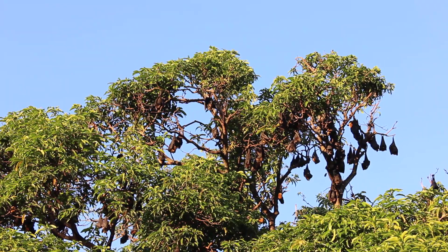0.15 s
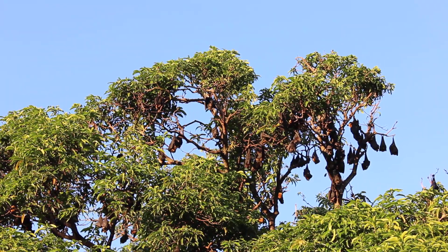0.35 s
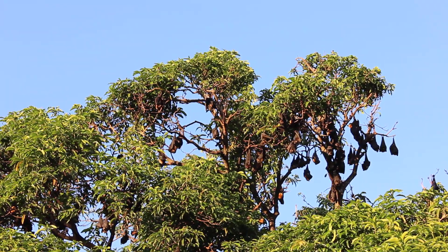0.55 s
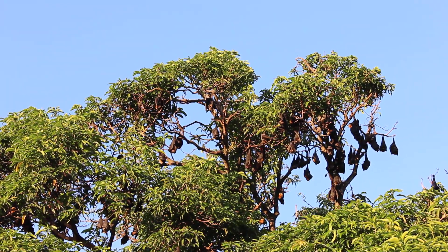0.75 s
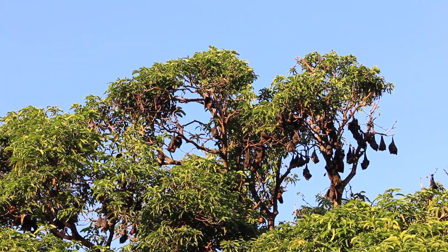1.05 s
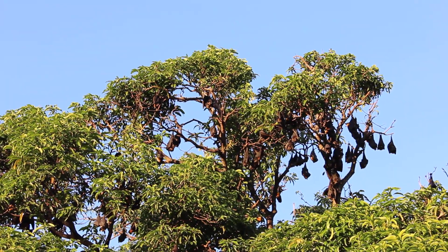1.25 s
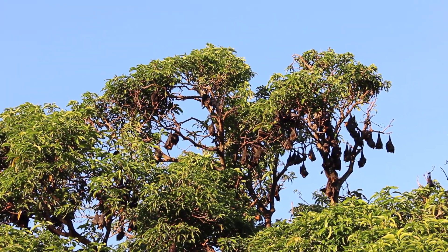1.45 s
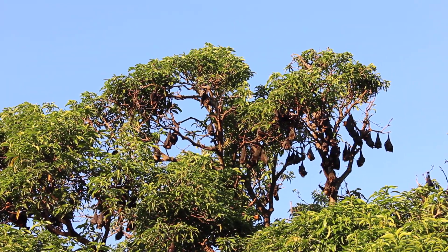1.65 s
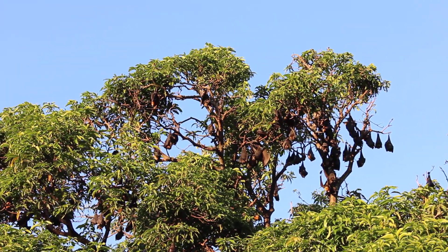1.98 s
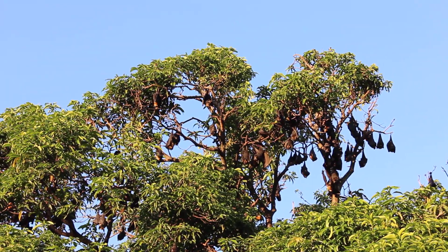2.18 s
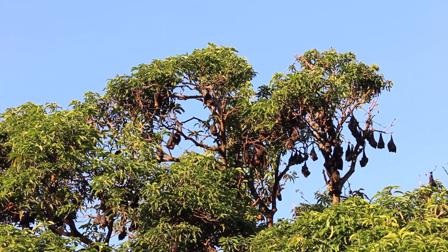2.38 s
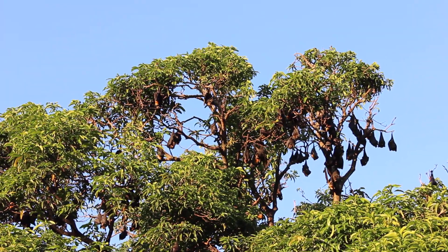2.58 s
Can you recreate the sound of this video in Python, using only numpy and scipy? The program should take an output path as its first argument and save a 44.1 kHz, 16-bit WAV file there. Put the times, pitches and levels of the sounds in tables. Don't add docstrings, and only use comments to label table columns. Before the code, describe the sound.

Bats squeal and chatter in a treetop roost, one closer voice standing out and breaking into a rasp midway, then neighbours answering as the crowd grows livelier; open air, soft leafy scatter, low distant rumble, centred microphone.

```python
import sys
import numpy as np
from scipy import signal
from scipy.fft import rfft, irfft
from scipy.io import wavfile

SR = 44100
rng = np.random.default_rng(int(sys.argv[2]) if len(sys.argv) > 2 else 0)


def elevation(decibels):
    levels = np.asarray(decibels, float)
    return 10 ** (levels / 20)


def master_out(mix):
    frames = np.transpose(np.atleast_2d(mix))
    ceiling = np.clip(frames, -1, 1)
    pcm = np.round(ceiling * 32767).astype(np.int16)
    wavfile.write(sys.argv[1], SR, pcm)


N = 119952
T = np.arange(N) / SR

OVERTONES_DB = [-28.5, -33, -41, -44, -44]
ATTACK_S, RELEASE_S = .004, .011
WAVER_SHARE, WAVER_PER_S = .006, 45
FLUTTER_DB, FLUTTER_PER_S = 2.6, 70
TOP_HZ = 15750


def rms_one(x):
    return x / np.sqrt(np.mean(x ** 2) + 1e-20)


def drift(rate):
    pole = np.exp(-32 * np.pi * rate / SR)
    noise = rng.standard_normal(N // 16 + 2002)
    slow = signal.lfilter([1], [1, -2 * pole, pole * pole], noise)[2000:]
    return np.interp(np.arange(N) / 16, np.arange(len(slow)), rms_one(slow))


def span(start, length):
    end = start + length + RELEASE_S
    at = slice(max(int(start * SR), 0), min(int(end * SR), N))
    t = T[at] - start
    rise, fall = t / ATTACK_S, (length + RELEASE_S - t) / RELEASE_S
    return at, np.clip(np.minimum(rise, fall), 0, 1)


def band(x, low_hz, high_hz):
    sos = signal.butter(2, [low_hz, min(high_hz, .45 * SR)], "band", fs=SR, output="sos")
    return signal.sosfilt(sos, x)


def coloured(spectrum, patchy_db):
    hz, db = np.transpose(spectrum)
    f = np.arange(N // 2 + 1) * SR / N + 1e-3
    edges = 20 * 2 ** np.arange(0, 10, 1 / 3)
    shaped = rfft(rng.standard_normal(N)) * elevation(np.interp(np.log(f), np.log(hz), db, left=-99))
    out = np.zeros(N)
    for low, high in zip(edges, edges[1:]):
        out += elevation(patchy_db * drift(7.4)) * irfft(shaped * (f >= low) * (f < high), N)
    return rms_one(out)


def voice(hz, overtones):
    phase = 2 * np.pi * np.cumsum(hz) / SR
    tone = np.sin(phase)
    for multiple, db in enumerate(overtones, 2):
        tone = tone + elevation(db) * np.sin(multiple * phase) * (multiple * hz < TOP_HZ)
    return np.sqrt(2) * tone


def squeals(calls, rough):
    out, waver, flutter = np.zeros(N), drift(WAVER_PER_S), drift(FLUTTER_PER_S)
    for rows in calls:
        s, pitch, db = np.transpose(rows)
        at, shape = span(s[0], s[-1] - s[0])
        level = elevation(np.interp(T[at], s, db) + rough * FLUTTER_DB * flutter[at])
        hz = np.interp(T[at], s, pitch) * (1 + rough * WAVER_SHARE * waver[at])
        out[at] += shape * level * voice(hz, OVERTONES_DB)
    return out


def chirps(rows, waver_share, overtones):
    out, waver, flutter = np.zeros(N), drift(WAVER_PER_S), drift(FLUTTER_PER_S)
    for k, (s, length, first, last, db) in enumerate(rows):
        at, shape = span(s, length)
        own = (np.arange(at.start, at.stop) + 7919 * k) % N
        hz = np.interp(T[at], [s, s + length], [first, last]) * (1 + waver_share * waver[own])
        out[at] += shape * elevation(db + FLUTTER_DB * flutter[own]) * voice(hz, overtones)
    return out


def trees(x):
    t60_s = .22
    t = T[:SR // 2]
    tail = rng.standard_normal(len(t)) * elevation(-60 * t / t60_s) * (t > .004)
    return signal.fftconvolve(x, tail / np.sqrt(np.sum(tail ** 2)))[:N]


def wind_and_traffic():
    # [f/Hz, level/dB per Hz]
    rumble_spectrum = [(21, -38), (35, -7.5), (119, 2), (451, -4.5), (838, -1.5), (1550, -3.5),
                       (1900, -7.5), (2470, -50), (4180, -120)]
    return elevation(-31) * coloured(rumble_spectrum, patchy_db=0.91)


def blurred_chorus(stir_db):
    # [f/Hz, level/dB per Hz]
    blur_spectrum = [(1500, -20.5), (2000, -6.5), (2600, -1), (3900, -8.5), (6900, -16), (9200, -29.5),
                     (13000, -36), (15800, -40)]
    follows = 0.22
    return elevation(-22.5 + follows * (stir_db - stir_db.mean())) * coloured(blur_spectrum, patchy_db=1.77)


def far_crowd(stir_db, count=600):
    pitch_hz, spread, glide_share, call_s, uneven_db = 2683, 0.13, 0.0415, 0.0338, 2.0
    place, size = rng.random((count, 2)).T
    pitch, glide, uneven = rng.standard_normal((count, 3)).T
    first = pitch_hz * np.exp(spread * np.where(pitch > 0, pitch, .6 * pitch))
    last = first * (1 + glide_share * glide)
    rows = zip(place * N / SR - .01, call_s * (0.542 + 1.5 * size), first, last, uneven_db * uneven)
    calls = rms_one(chirps(list(rows), 0.02075, [-22]))
    return elevation(stir_db - 6) * rms_one(calls + elevation(10.5) * trees(calls))


def chirping_bats():
    # [t/s, length/s, first f/Hz, last f/Hz, level/dB]
    near_chirps = [(0, .07, 3600, 3440, -30), (.04, .035, 4720, 4600, -34), (.25, .05, 3180, 3170, -31),
                   (.485, .04, 3260, 3250, -28), (.70, .035, 2720, 2920, -27), (.735, .03, 2920, 2750, -31),
                   (.725, .022, 2250, 2340, -24), (.825, .045, 3360, 3350, -25),
                   (.92, .045, 3260, 3260, -28), (1.005, .045, 3260, 3270, -25),
                   (1.065, .105, 4420, 4220, -29), (1.085, .075, 3560, 3480, -31),
                   (1.07, .08, 2780, 2660, -28), (1.395, .03, 2500, 2780, -23),
                   (1.44, .06, 4220, 4230, -33), (2.032, .01, 2700, 3120, -19),
                   (2.042, .01, 3150, 3130, -16), (2.06, .04, 2960, 2820, -22),
                   (2.07, .09, 3080, 3100, -28), (2.15, .02, 2290, 2300, -24),
                   (2.215, .02, 2800, 2830, -26), (1.64, .1, 2760, 2720, -27)]
    # [t/s, length/s, first f/Hz, last f/Hz, level/dB]
    edge_chirps = [(.035, .04, 5300, 5150, -34), (.662, .03, 5200, 5780, -34),
                   (.692, .012, 5780, 5760, -35), (.708, .008, 5700, 5800, -29),
                   (.722, .02, 5750, 5600, -35), (.68, .09, 1630, 1640, -39), (.71, .025, 3550, 3620, -31),
                   (.73, .012, 6780, 7080, -28), (.755, .03, 6960, 7000, -30),
                   (.742, .008, 6250, 6400, -31), (.81, .02, 5250, 5280, -35),
                   (1.30, .035, 5250, 5050, -33), (1.335, .055, 3000, 2960, -29),
                   (1.42, .025, 3450, 3480, -30), (1.51, .07, 3500, 3480, -33),
                   (1.575, .025, 1920, 1910, -32), (1.80, .03, 2550, 2560, -25),
                   (2.09, .29, 1740, 1745, -37.5), (2.26, .04, 3150, 3140, -27),
                   (2.31, .07, 3500, 3480, -28), (2.335, .025, 3140, 3130, -28),
                   (2.41, .055, 3200, 3170, -28), (1.865, .065, 740, 860, -37),
                   (1.955, .035, 840, 730, -37), (1.822, .016, 780, 780, -37),
                   (1.655, .03, 4780, 4820, -36), (1.745, .05, 4620, 4720, -35),
                   (1.82, .04, 4900, 5050, -36), (1.945, .025, 4800, 4760, -33),
                   (1.87, .04, 6600, 6450, -38)]
    return chirps(near_chirps + edge_chirps, WAVER_SHARE, OVERTONES_DB)


def screeches(count=28):
    # [t/s, length/s, throat f/Hz, width/Hz, level/dB]
    hoarse_calls = [(.135, .05, 12300, 4800, -44), (.2, .06, 11800, 4000, -44),
                    (.278, .09, 11800, 2800, -42), (.38, .14, 11700, 3000, -43), (.2, .21, 10200, 500, -48),
                    (.43, .095, 10700, 1000, -44), (.27, .2, 7700, 1800, -40), (.47, .06, 7400, 1400, -35),
                    (.135, .06, 6950, 400, -41), (.74, .045, 11700, 1800, -41), (.75, .3, 7600, 1700, -34),
                    (.79, .18, 7050, 450, -40), (.855, .115, 12200, 1100, -44),
                    (.995, .05, 12000, 900, -46), (.8, .05, 13050, 400, -54), (.67, .39, 9800, 3000, -45),
                    (.555, .06, 3200, 600, -27), (1.188, .035, 2900, 900, -25),
                    (.565, .045, 12150, 500, -50), (.66, .11, 5900, 1600, -38),
                    (1.45, .15, 9000, 5000, -48), (1.85, .16, 7000, 4000, -43), (1.72, .25, 4700, 800, -40),
                    (2.5, .22, 11500, 5000, -50), (2.51, .1, 6000, 2000, -39), (2.53, .14, 530, 160, -43),
                    (1.55, .3, 2500, 700, -24), (2.38, .3, 3500, 1200, -28)]
    rasp_hz, wander, jitter, breath = 540, .05, .005, .95
    hz = rasp_hz * (1 + wander * drift(8) + jitter * drift(120))
    phase = 2 * np.pi * np.cumsum(hz) / SR
    pulses = sum(np.cos(k * phase + k * k / 4) for k in range(1, count))
    rasp = rms_one(pulses) + breath * rng.standard_normal(N)
    rasp = rasp * elevation(0.58 * drift(11) + 1.0 * drift(210))
    out = np.zeros(N)
    for s, length, throat_hz, width, db in hoarse_calls:
        at, shape = span(s, length)
        throat = band(rasp[at], throat_hz - width / 2, throat_hz + width / 2)
        out[at] += elevation(db) * shape * rms_one(throat)
    return out


def neighbours():
    # [t/s, f/Hz, level/dB]
    shrill_squeals = [
        [(.325, 3060, -20), (.348, 2960, -22), (.362, 3200, -19), (.372, 3250, -21), (.385, 3290, -25),
         (.415, 3220, -22.5)],
        [(.555, 3244, -28), (.572, 3080, -22), (.585, 3150, -20), (.6, 3280, -21), (.612, 3230, -26)],
        [(2.245, 2410, -34), (2.27, 2520, -22), (2.295, 2624, -21), (2.31, 2520, -22), (2.335, 2450, -28)],
        [(2.355, 2600, -32), (2.39, 2530, -30), (2.415, 2480, -16), (2.43, 2580, -22), (2.46, 2570, -23)],
    ]
    # [t/s, f/Hz, level/dB]
    deep_squeals = [
        [(1.445, 2370, -20), (1.47, 2190, -21), (1.52, 2240, -22.5), (1.56, 2290, -25)],
        [(1.6, 2300, -25), (1.65, 2330, -24), (1.71, 2370, -25), (1.74, 2350, -25), (1.775, 2230, -25)],
        [(2.025, 2080, -27), (2.045, 2135, -22), (2.085, 2170, -27)],
        [(2.19, 2280, -24), (2.22, 2280, -21), (2.27, 2330, -26), (2.33, 2300, -26), (2.365, 2300, -23),
         (2.4, 2300, -28)],
        [(2.655, 2440, -26), (2.695, 2547, -14), (2.72, 2565, -26)],
    ]
    return squeals(deep_squeals + shrill_squeals, rough=.9)


def nearest_bat():
    # [t/s, f/Hz, level/dB]
    near_squeals = [
        [(.39, 2500, -28), (.404, 2476, -22), (.43, 2490, -24), (.462, 2524, -19)],
        [(.483, 2540, -26), (.505, 2350, -17), (.53, 2365, -12), (.542, 2395, -18), (.553, 2425, -12),
         (.564, 2400, -24), (.586, 2400, -27), (.604, 2520, -16), (.618, 2460, -21)],
        [(.793, 2540, -25), (.81, 2640, -12), (.842, 2630, -21), (.875, 2450, -23), (.925, 2490, -15),
         (.95, 2540, -22), (.975, 2430, -18), (1.03, 2469, -22)],
        [(1.035, 2460, -19), (1.086, 2465, -12), (1.105, 2590, -20), (1.133, 2500, -16), (1.148, 2500, -30),
         (1.157, 2540, -14), (1.164, 2530, -28), (1.171, 2580, -15), (1.181, 2730, -12)],
        [(1.43, 2880, -28), (1.458, 2934, -16), (1.47, 2860, -22), (1.495, 2890, -21), (1.52, 2792, -19),
         (1.54, 2835, -15), (1.575, 2790, -17), (1.635, 2750, -24)],
    ]
    return squeals(near_squeals, rough=.55)


def rasp_bursts():
    # [t/s, length/s, f/Hz, level/dB]
    rasp_pulses = [
        (1.189, 0.0083, 2700, -12.5),
        (1.2, 0.0047, 2660, -9.5),
        (1.2033, 0.0035, 2940, -12),
        (1.206, 0.0084, 2750, -16),
        (1.2145, 0.0066, 2640, -11.5),
        (1.2224, 0.0081, 2890, -13),
    ]
    out = np.zeros(N)
    for s, length, hz, db in rasp_pulses:
        at = slice(int(s * SR), int((s + length) * SR))
        swell = np.sin(np.pi * (T[at] - s) / length)
        out[at] += elevation(db) * swell * voice(hz + 0 * T[at], OVERTONES_DB)
    return out


def side_hiss():
    out = np.zeros(N)
    at, shape = span(2.607, 0.03)
    out[at] = elevation(-37) * shape * rms_one(band(rng.standard_normal(len(shape)), 4300, 4540))
    return out


def scene():
    # [t/s, level/dB]
    crowd_stir = [
        (0.0, -22),
        (1.11, -21.5),
        (1.22, -24),
        (1.72, -18),
        (2.72, -18),
    ]
    stir_db = np.interp(T, *np.transpose(crowd_stir))
    background = wind_and_traffic() + blurred_chorus(stir_db) + far_crowd(stir_db)
    near = chirping_bats() + screeches() + neighbours() + nearest_bat() + rasp_bursts()
    mono = background + near + elevation(-15.5) * trees(near)
    side = side_hiss()
    return np.array([mono + side, mono - side])


def low_pass(x):
    return signal.sosfilt(signal.butter(12, 15820, fs=SR, output="sos"), x)


def record(dry):
    return low_pass(dry)


dry = scene()
out = record(dry)
master_out(out)
```